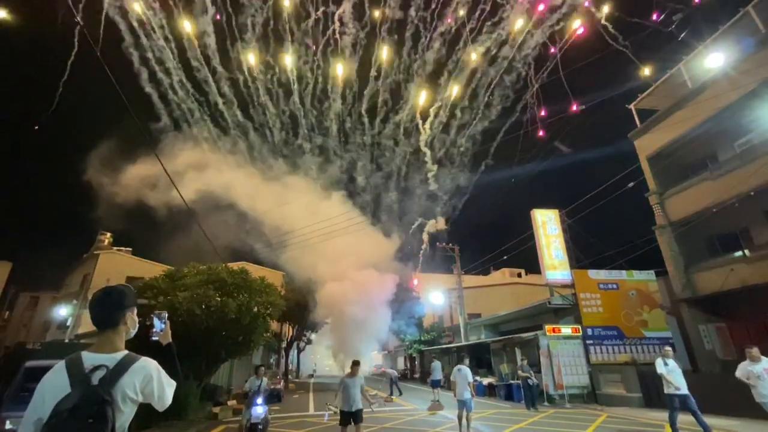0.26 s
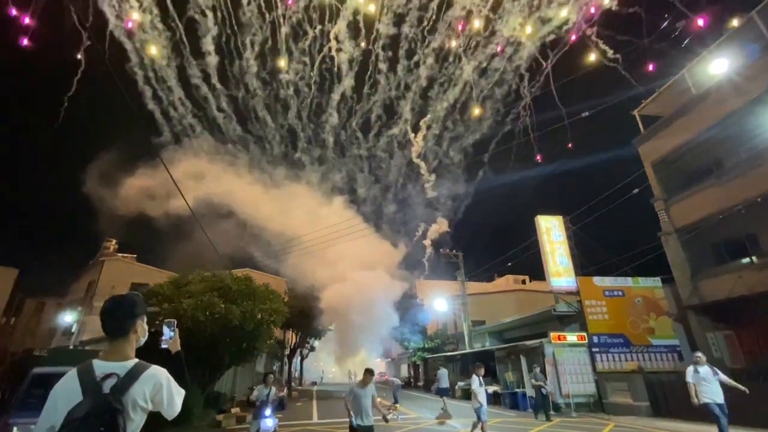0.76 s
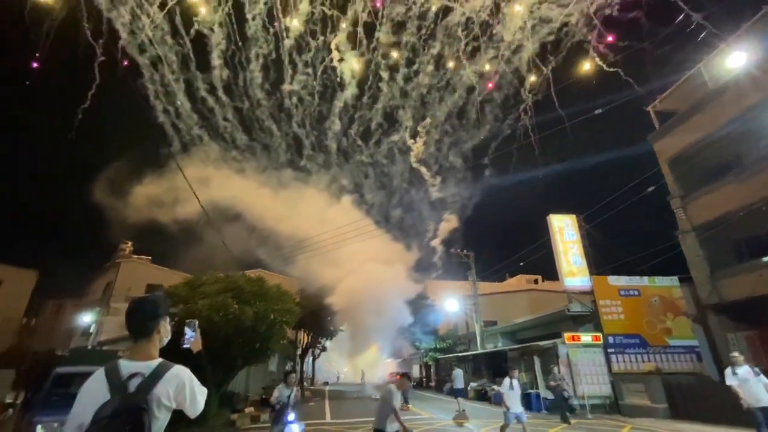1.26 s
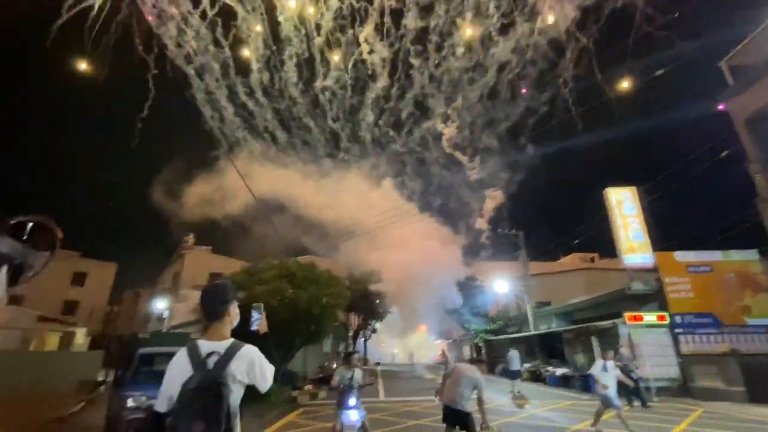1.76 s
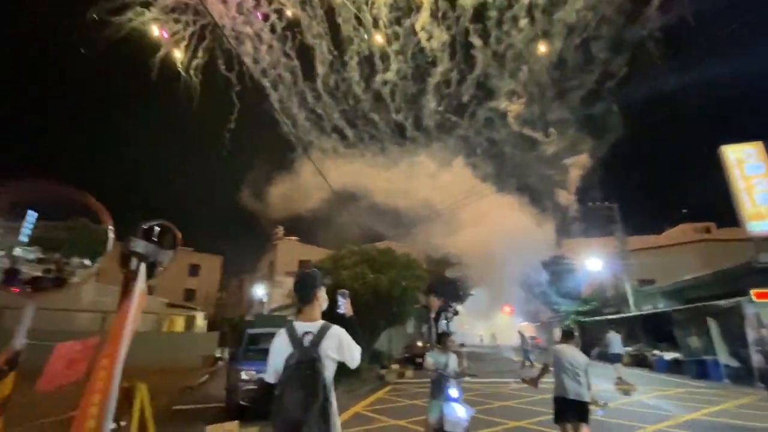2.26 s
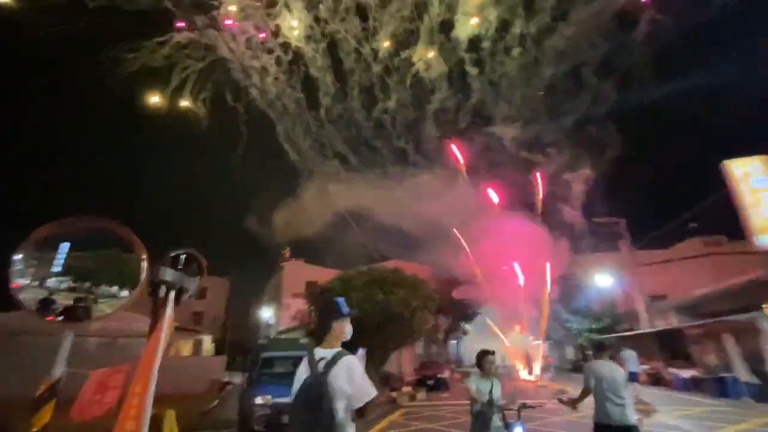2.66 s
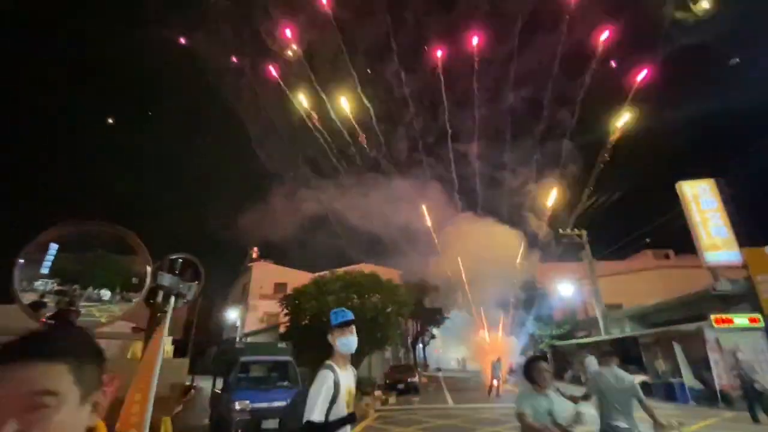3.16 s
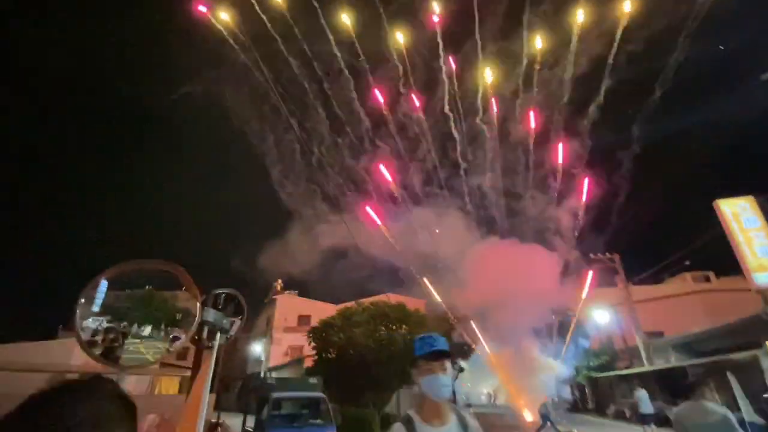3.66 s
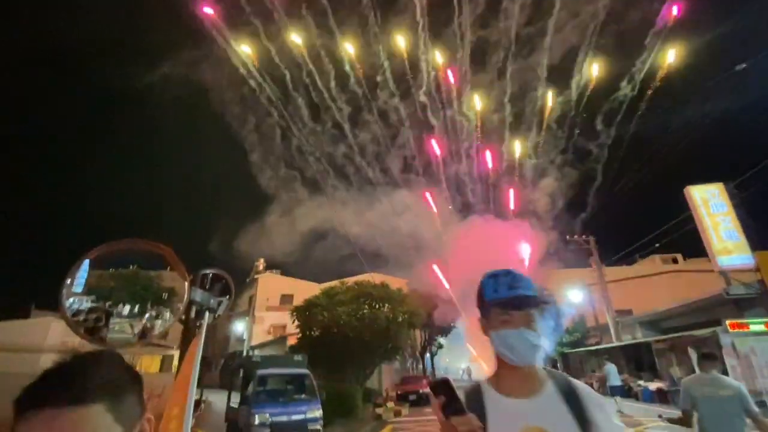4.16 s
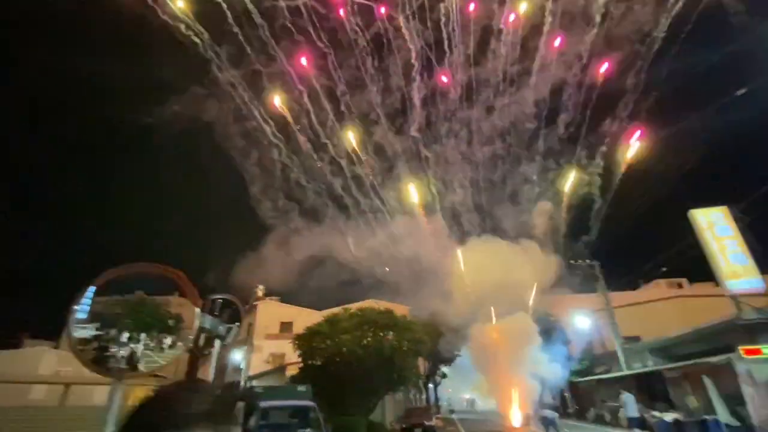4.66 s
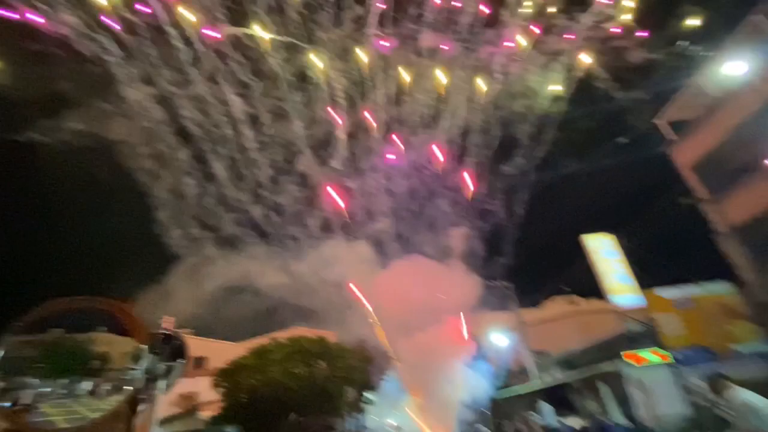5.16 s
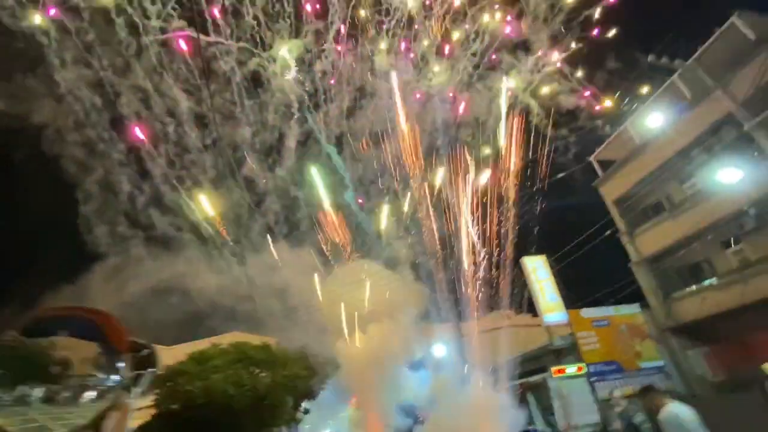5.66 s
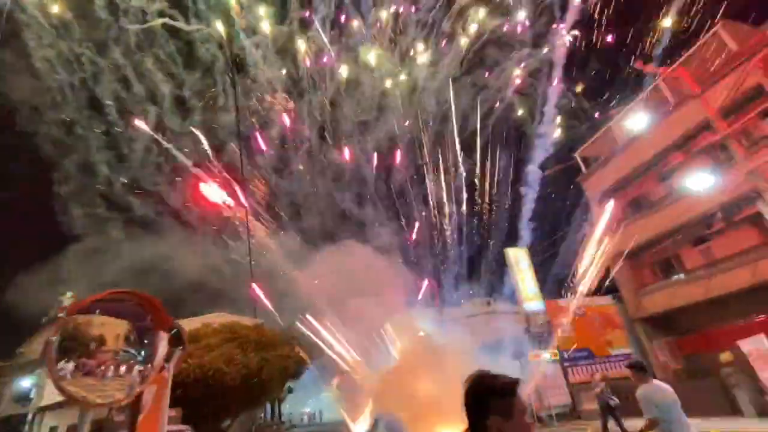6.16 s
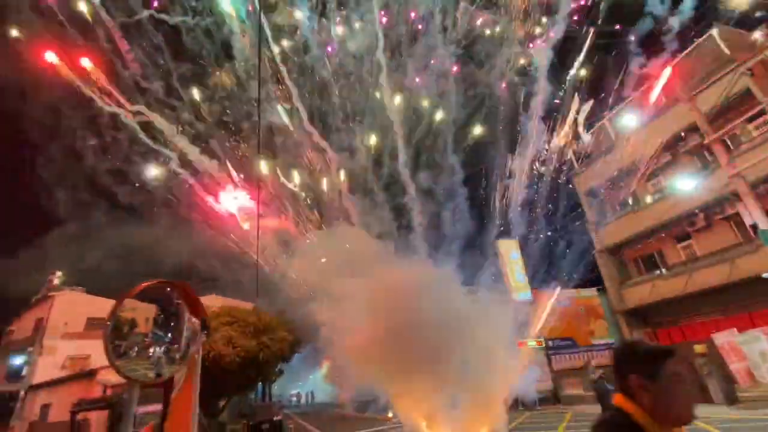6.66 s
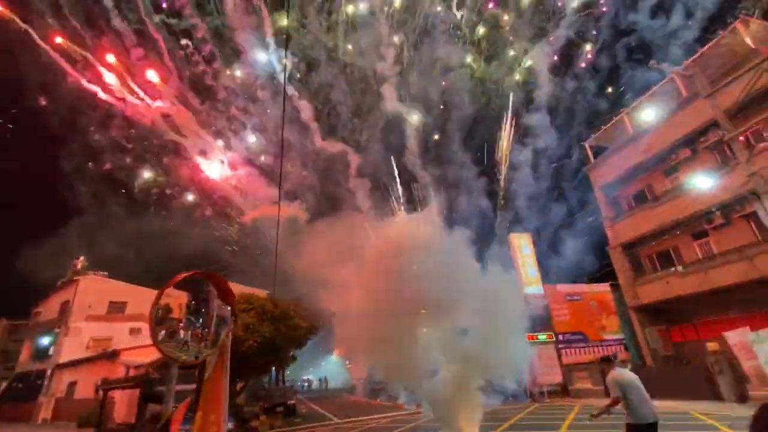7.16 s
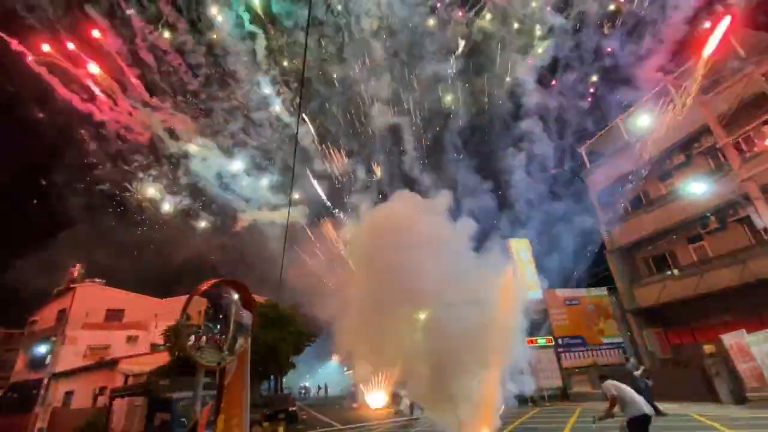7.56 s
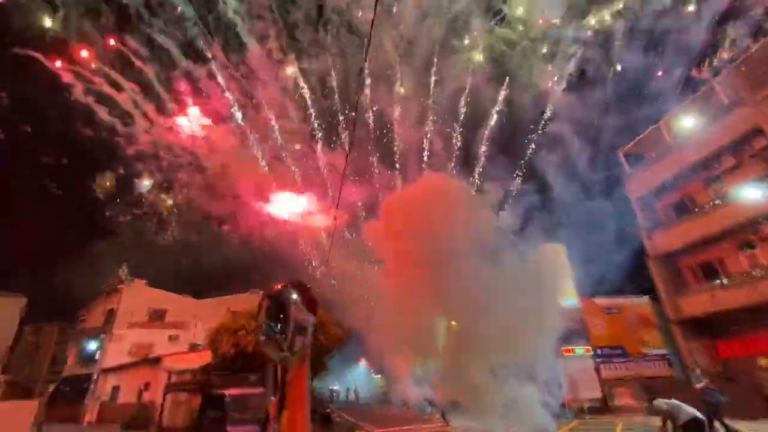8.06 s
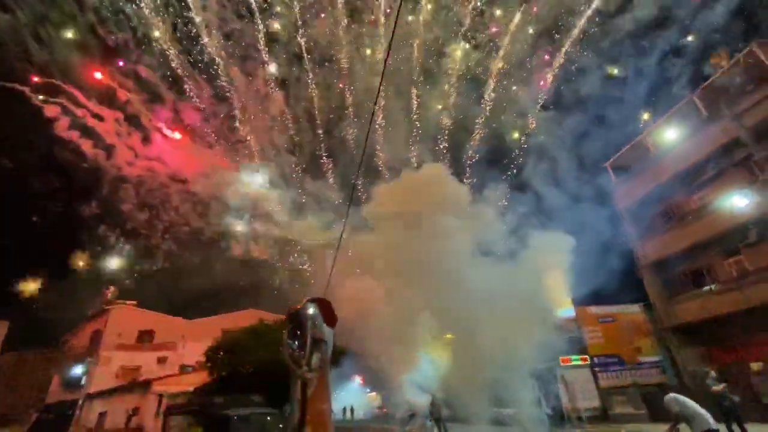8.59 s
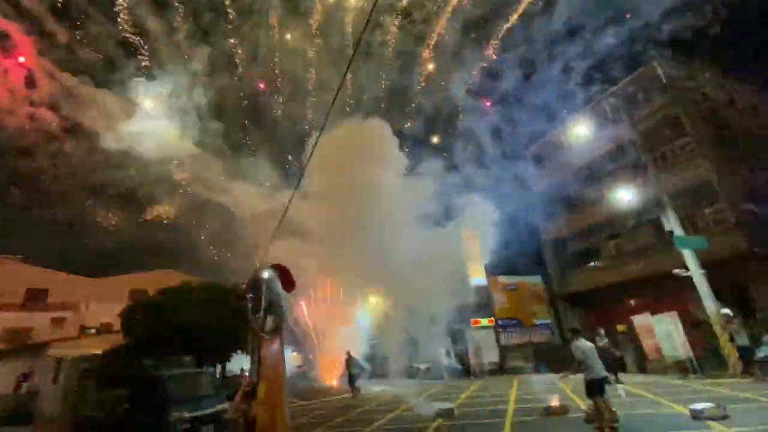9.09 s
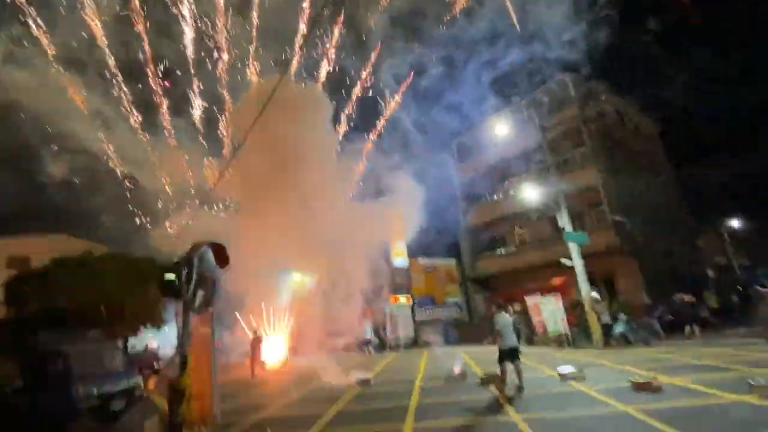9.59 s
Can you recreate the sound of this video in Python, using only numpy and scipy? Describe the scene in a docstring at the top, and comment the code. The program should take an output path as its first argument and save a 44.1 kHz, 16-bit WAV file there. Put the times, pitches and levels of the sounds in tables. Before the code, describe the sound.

Night street fireworks, heard outdoors by a close handheld stereo microphone that overloads on peaks. From 0 to 1.9 s, irregular shells pop overhead, sharp or dull, each followed milliseconds later by a duller road reflection; a tearing cluster hits at 1.5. A short lull with low rumble and a very faint hum follows until 2.4. Then tube batteries fire about twenty shots a second, low thumps with midrange cracks, some piercingly sharp, over sizzling sparks and far firecracker strings. Bangs are heaviest from 4.5 to 5.4. From 5.4 to about 8, over twenty shrill whistles overlap, starting high and falling as they fade, one wobbling early on, while thumps weaken. A ripping bang lands at 7.6. Crackle continues more thinly; star snaps come from 8.9, with tearing bangs at 9.1 and 9.6, the last with a brief hollow ring. House fronts give uneven, dying echoes, and bangs sweep downward.

```python
"""Batteries of tubes thump out stars in a street at night: low pressure jumps, each topped by a crack, some very sharp.
Shells pop overhead with an echo off the road, crackling stars snap late on, and clusters of charges tear.
Whistling rockets, tones that fall in pitch, climb away over crackling sparks and far firecracker strings.
House fronts throw the bangs and whistles back as uneven, dying echoes over a low rumble.
The recorder delays low notes, so that each bang sweeps downward."""
import sys
import numpy as np
from scipy import signal
from scipy.fft import rfft, irfft, next_fast_len
from scipy.io import wavfile
from scipy.ndimage import uniform_filter1d

SR = 44100
rng = np.random.default_rng(int(sys.argv[2]) if len(sys.argv) > 2 else 0)


def wav_out(sig):
    """Save sig, one row per channel (or a flat mono array), as 16-bit PCM at SR to the path in sys.argv[1]."""
    wavfile.write(sys.argv[1], SR, np.round(np.clip(np.atleast_2d(sig).T, -1, 1) * 32767).astype(np.int16))


N = 433503
TIME = np.arange(N) / SR


def amp(db):
    """Turns decibels into a gain."""
    return 10 ** (np.asarray(db) / 20)


def unit(x):
    """Scales a sound to an rms of one."""
    return x / np.sqrt(np.mean(x ** 2) + 1e-20)


def read(points, hz):
    """Reads a table between its points, on a log-frequency axis."""
    f, value = np.transpose(points)
    return np.interp(np.log(hz + 1), np.log(f + 1), value)


def level(curve, db):
    """Gain over time from a curve of (start_s, level_db), shifted by db."""
    return amp(db + np.interp(TIME, *np.transpose(curve)))


def add(mix, s, sound):
    """Mixes a sound into both channels at time s."""
    start = round(s * SR)
    part = mix[:, max(start, 0):max(start + sound.shape[1], 0)]
    part += sound[:, max(-start, 0):][:, :part.shape[1]]


def filtered(x, response):
    """Applies a response given as a function of frequency."""
    size = next_fast_len(x.shape[-1] + SR // 4)
    spectrum = rfft(x, size) * response(np.fft.rfftfreq(size, 1 / SR))
    return irfft(spectrum, size)[..., :x.shape[-1]]


def wander(t, per_s, count=4096):
    """A random curve of about unit size that picks a new value per_s times a second."""
    return np.interp(t * per_s, np.arange(count), rng.standard_normal(count))


# How alike sound from all around is at left and right: freq_hz, correlation (no unit)
LIKENESS = [(60, 0.88), (180, 0.94), (300, 0.89), (640, 0), (1500, 0.3), (3000, 0.12)]


def diffuse(x):
    """Sound from all around: alike on both sides in the bass, mostly unrelated in the treble."""
    def same(hz):
        return np.clip(read(LIKENESS, hz), -1, 1)

    shared = filtered(x[0], same)
    separate = filtered(x[1], lambda hz: np.sqrt(1 - same(hz) ** 2))
    return np.array([x[0], shared + separate])


def bed(drive, spectrum, gain):
    """Colours a steady texture with a spectrum and lets it follow a gain over time."""
    return unit(filtered(drive, lambda hz: amp(read(spectrum, hz)))) * gain


def crackle(per_s, spread_db, hiss):
    """Random snaps of varying size, each from its own direction, over the hiss of countless smaller ones."""
    happens = rng.random(N) < per_s / SR
    left = amp(spread_db * np.minimum(rng.exponential(1, N), 3)) * happens
    # direction: each snap reaches the right up to 14 samples early or late, louder or softer
    places = np.clip(np.arange(N) + rng.integers(-14, 14, N), 0, N - 1)
    right = np.bincount(places, left * rng.uniform(.5, 1.5, N), N)
    return unit(np.array([left, right])) + hiss * rng.standard_normal((2, N))


def clumped(x, swell_db, patch_db):
    """Snaps come in clumps: all bands swell together, and patches of colour come and go."""
    hz, t, z = signal.stft(x, SR, nperseg=256)
    patches = rng.standard_normal(z.shape[1:])
    patches = uniform_filter1d(patches, size=7, axis=0)
    patches = unit(uniform_filter1d(patches, size=12, axis=1))
    gain = amp(swell_db * wander(t, 28) + patch_db * patches)
    return signal.istft(z * gain, SR, nperseg=256)[1][:, :N]


def puff(hz, decay_s, above_hz):
    """Spectra, one for each side, of a few milliseconds of dying noise with little bass."""
    t = np.arange(2 * len(hz) - 2) / SR
    noise = rng.standard_normal((2, len(t))) * np.exp(-t / decay_s)
    return rfft(noise / np.linalg.norm(noise[0])) * 1j * hz / (above_hz + 1j * hz)


def blast(db, centre_hz, edge_hz, lag_s, echoes, roughness=0, size=2048):
    """A pressure jump and its suction, (1 - u) exp(-u), dulled by air, with a short rough wake of turbulent gas.
    Echoes are (delay_s, left gain, right gain); lag_s is how much later the left side hears it."""
    hz = np.fft.rfftfreq(size, 1 / SR)

    def delay(s):
        return np.exp(-2j * np.pi * hz * s)

    u = 1j * hz / centre_hz
    jump = amp(db) * SR / (2 * np.pi * centre_hz) * u / (1 + u) ** 2
    dulled = jump / (1 + 1j * hz / edge_hz) ** 2
    paths = np.array([delay(lag_s), delay(0)])
    for s, left, right in echoes:
        paths = paths + np.array([[left], [right]]) * delay(s)
    paths += roughness * puff(hz, decay_s=0.0048, above_hz=294)
    # 64 samples of room, so that the left side can also come first
    return irfft(dulled * paths * delay(64 / SR), size)


TRAFFIC_DB, ROLL_DB = -51, -8  # steady street rumble, and the roll that follows each bang
ROLL_RISE_S, ROLL_DECAY_S = 0.0037, 0.12


def roll(bangs):
    """Gain of the rumble: each bang swells it and it dies back to the traffic."""
    power = (bangs ** 2).mean(0)
    for seconds in ROLL_RISE_S, ROLL_DECAY_S:
        keep = np.exp(-1 / (seconds * SR))
        power = signal.lfilter([1 - keep], [1, -keep], power)
    return np.sqrt(amp(ROLL_DB) ** 2 * power + amp(TRAFFIC_DB) ** 2)


# Tone of the street rumble: freq_hz, relative level_db
RUMBLE = [(20, -26), (40, -5), (62, 3), (100, 0), (200, 4.5), (350, -0.5), (600, 7), (1500, -41)]


def street_rumble(bangs):
    """Low noise from all around, swelled by the deeper part of the bangs."""
    deep = filtered(bangs, lambda hz: 1 / (1 + (hz / 900) ** 2))
    return bed(diffuse(rng.standard_normal((2, N))), RUMBLE, roll(deep))


# Tone of the far firecracker strings: freq_hz, relative level_db
FAR_TONE = [(100, -31), (300, -4.5), (600, 4), (1000, 1.5), (1600, -1.5), (2500, -3.5), (5000, -13),
            (12000, -31)]
# Loudness of the far strings, before a small trim: start_s, level_db
FAR_LEVEL = [(0.0, -31.5), (0.44, -45.5), (0.68, -38), (0.96, -42), (1.45, -38), (1.75, -35.5),
             (2.19, -48.5), (2.46, -54), (2.6, -25), (2.65, -33), (3.45, -27), (6.41, -31), (6.79, -36.5),
             (7.64, -32.5), (8.05, -35), (9.17, -35.5), (9.44, -42), (9.83, -37)]


def far_strings():
    """Far firecracker strings: hundreds of random snaps a second over hiss, in clumps."""
    snapping = crackle(per_s=500, spread_db=3.5, hiss=1.0)
    return bed(clumped(snapping, swell_db=0.5, patch_db=3.0), FAR_TONE, level(FAR_LEVEL, db=-1.97))


# Tone of burning sparks, also used by the stars: freq_hz, relative level_db
FIZZ_TONE = [(600, -9.5), (1500, 0), (2500, 0.5), (4000, 1.5), (5500, -0.5), (7000, -4), (8200, -5),
             (12000, -14.5), (16000, -16)]
# Loudness of the burning sparks, before a trim: start_s, level_db
FIZZ_LEVEL = [(0.0, -55), (1.07, -67.5), (1.72, -59), (2.14, -75), (2.46, -68), (2.6, -32), (2.68, -39),
              (2.94, -34), (3.0, -49), (3.15, -41), (3.6, -37.5), (3.7, -44), (3.9, -37), (4.02, -43),
              (4.6, -38), (5.25, -53), (5.45, -36.5), (6.02, -36.5), (6.54, -31), (6.81, -34.5), (7.5, -31),
              (7.97, -34.5), (8.51, -35), (8.93, -34), (9.39, -39), (9.83, -39)]


def burning_sparks():
    """Burning sparks: dense, bright random snaps over hiss, in clumps."""
    snapping = crackle(per_s=900, spread_db=2.5, hiss=0.93)
    return bed(clumped(snapping, swell_db=0.7, patch_db=2.0), FIZZ_TONE, level(FIZZ_LEVEL, db=4.5))


def hum(start_s=1.73, length_s=0.43, hz=199, level_db=-50):
    """A faint low sine swells and fades in the street as the first shells die away."""
    out, t = np.zeros((2, N)), np.arange(0, length_s, 1 / SR)
    swell = amp(level_db) * np.sin(np.pi * t / length_s)
    add(out, start_s, (swell * np.sin(2 * np.pi * hz * t))[None])
    return out


# Hollow ring: start_s, pitch_hz, level_db, t60_s (time to die by 60 dB)
RING = [(9.632, 386, -26.5, 0.25), (9.632, 730, -24, 0.17)]


def ring():
    """Something hollow rings at the last bangs: unsteady sines that die away."""
    out, t = np.zeros((2, N)), np.arange(SR // 2) / SR
    for s, hz, db, t60 in RING:
        gain = amp(db - 60 * t / t60) * (1 + 0.68 * wander(t, 106))
        add(out, s, gain * np.sin(2 * np.pi * hz * t)[None])
    return out


# How long echoes last in the street: freq_hz, t60_s (time to die by 60 dB)
STREET_T60 = [(60, 0.089), (250, 0.44), (1000, 0.23), (4000, 0.37), (12000, 0.13)]


def street(x, first_s=0.0038, lumpy_db=4):
    """Uneven echoes from house fronts, each band dying at its own speed."""
    t = np.arange(SR) / SR
    taps = rng.standard_normal((2, SR)) * (rng.random((2, SR)) < 1500 / SR)  # about 1500 echoes a second
    taps = taps * amp(lumpy_db * wander(t, 118.0)) * (1 - np.exp(-(t / first_s) ** 2))
    hz, age, z = signal.stft(diffuse(taps), SR, nperseg=256)
    dying = amp(-60 * age / read(STREET_T60, hz)[:, None])
    tail = signal.istft(z * dying, SR, nperseg=256)[1]
    return signal.fftconvolve(x, tail / np.linalg.norm(tail[0]), axes=1)[:, :N]


def rotating_echoes(x, count=4):
    """Several sets of street echoes take turns, blending into one another over time."""
    turns = TIME * 3.3  # goes round all the sets 3.3 times a second
    out = np.zeros((2, N))
    for k in range(count):
        away = np.minimum(count * abs((turns + k / count) % 1 - .5), 1)
        out += street(x * np.cos(np.pi / 2 * away))
    return out


# Charges that go off almost together: start_s, length_s, level_db (of the loudest possible charge),
# centre_hz (middle pitch of the blasts; single charges scatter around it)
CLUSTERS = [(.001, 0.01, -9, 570), (1.543, 0.0097, -3.5, 800), (2.408, 0.0071, -13, 550),
            (5.029, 0.019, -2, 800), (5.316, 0.0038, -18, 91.5), (7.604, 0.017, 2, 967),
            (9.081, 0.013, 3, 1390), (9.614, 0.019, 5.5, 1550), (9.623, 0.013, -6, 230),
            (9.65, .03, -14, 280)]
CLUSTER_EDGE_RATIO = 4.8  # treble edge over centre_hz


def clusters(count=9, early_s=.0008):
    """Several charges share a fuse and blur into one tearing bang."""
    out = np.zeros((2, N))
    for s, length, db, centre_hz in CLUSTERS:
        edge_hz = CLUSTER_EDGE_RATIO * centre_hz
        for k, (a, b, c) in enumerate(rng.random((count, 3))):
            echoes = [(0.0022 * c, .4, -.3)]
            charge_hz = centre_hz * 2 ** (c - .5)
            bang = blast(db - 6 * b, charge_hz, edge_hz, 0.000063 * (b - .5), echoes, roughness=0.82)
            add(out, s - early_s + length * (k + a) / count, bang)
    return out


def whistle(t, hz, gain, shriek_db, flutter_db=2.5, second_db=-13, third_db=-18, rasp=0.39,
            shriek_ratio=1.48, shriek_s=0.14, ground=0.42):
    """A burning tube sings on the pitch hz, with breathy overtones and an echo off the road."""
    # the flame is unsteady, most of all just after lighting
    jitter = (.032 * wander(t, 900) + .028 * wander(t, 160)) / (1 + t / .08)
    jitter += (.012 * wander(t, 400) + .013 * wander(t, 35)) / (1 + t / .7)
    phase = 2 * np.pi * np.cumsum(hz * (1 + jitter)) / SR
    tone = np.sin(phase)
    tone += amp(second_db) * np.sin(2 * phase) * wander(t, 1200)
    tone += amp(third_db) * np.sin(3 * phase) * wander(t, 2500)
    # the rushing exhaust spreads a hoarse band above the note, strongest at lift-off
    tone += rasp * np.sin(1.12 * phase) * wander(t, 1300) * (.5 + np.exp(-t / .06))
    # a higher mode of the tube builds up and shrieks on and off
    shriek = np.sin(shriek_ratio * phase) * (.5 + .8 * wander(t, 500))
    tone += amp(shriek_db) * shriek * (1 - np.exp(-t / .012)) * np.exp(-t / shriek_s)
    tone *= gain * amp(flutter_db * wander(t, 129.0))
    # the road's echo lags more and more as the rocket climbs
    road_lag_s = 0.0066 * t / (t + 0.376)
    sides = []
    for direct_s, echo_s in rng.uniform(0, 0.000399, (2, 2)):
        direct = np.interp(t - direct_s, t, tone)
        sides.append(direct + ground * np.interp(t - echo_s - road_lag_s, t, tone))
    return np.array(sides)


# Path of the tumbling rocket: start_s, pitch_hz, level_db
TUMBLER = [(5.43, 3600, -15), (5.438, 3800, -8), (5.443, 4450, -22), (5.452, 3650, -19), (5.462, 4400, -15),
           (5.475, 3850, -23), (5.487, 4200, -20), (5.535, 3850, -23), (5.55, 3250, -24),
           (5.572, 3650, -19), (5.6, 3230, -28), (5.64, 3280, -27), (5.66, 3500, -29), (5.681, 3230, -33),
           (5.7, 3480, -23), (5.72, 3280, -24), (5.75, 3480, -20), (5.79, 3230, -23), (5.81, 3400, -30),
           (5.87, 3180, -30)]


def tumbler(fade_s=.003):
    """One rocket tumbles, so that its note swings up and down as it sinks."""
    out, (when, hz, db) = np.zeros((2, N)), np.transpose(TUMBLER)
    t = np.arange(0, when[-1] - when[0], 1 / SR)
    fade = np.minimum(np.minimum(t, t[-1] - t) / fade_s, 1)
    gain = amp(np.interp(t + when[0], when, db)) * fade
    add(out, when[0], whistle(t, np.interp(t + when[0], when, hz), gain, shriek_db=-7))
    return out


# Whistling rockets: start_s, level_db (before trim_db), start_hz, settled_hz (after the first drop),
# end_hz (where the sag leads), drop_s (time of the first drop), away_s (time to half strength),
# shriek_db (against the note)
ROCKETS = [(5.374, -9.5, 4300, 3374, 2570, 0.015, .033, -9),
           (5.612, -16.5, 4440, 3410, 2854, .024, 0.044, -8),
           (5.724, -17, 3610, 3460, 2795, .03, 0.082, -3),
           (5.892, -15.5, 4200, 3400, 2734, 0.019, 0.11, -3),
           (5.975, -20.5, 4180, 3320, 2732, 0.032, .13, -13),
           (6.01, -17, 3540, 3260, 2685, 0.037, 0.089, -24),
           (6.09, -20.5, 4360, 3316, 2670, 0.031, .06, -20),
           (6.267, -18, 4106, 3400, 2588, 0.035, 0.12, -1), (6.29, -20, 4090, 3450, 2690, 0.032, .1, 2),
           (6.368, -12.5, 3400, 3140, 2743, 0.027, 0.036, -17),
           (6.39, -16, 4290, 3500, 2740, 0.028, .035, -6),
           (6.495, -18.5, 3966, 3380, 2800, .022, 0.21, -6.5),
           (6.547, -18, 4100, 3310, 2762, .018, 0.068, -4.5),
           (6.558, -14.5, 4730, 3540, 2920, .028, 0.057, -8),
           (6.72, -17, 4055, 3340, 2860, 0.021, 0.081, -5), (7.005, -21, 4120, 3400, 2640, .03, .08, -5),
           (7.106, -22, 4066, 3270, 2610, 0.024, 0.17, -7),
           (7.239, -20.5, 4110, 3335, 2540, 0.028, 0.088, -6),
           (7.315, -18.5, 3830, 3490, 2564, 0.026, 0.15, -2),
           (7.388, -20, 4320, 3530, 2650, 0.029, 0.078, -12),
           (7.478, -17.5, 3645, 3435, 2660, .025, 0.08, -2.5),
           (7.625, -18, 3610, 3210, 2610, .028, 0.043, -14),
           (7.702, -26, 4110, 3450, 2846, 0.025, 0.28, -7)]
SAG_S, BURN_S = .3, 0.81  # time of the slow sag in pitch, and how long a rocket whistles


def whistles(trim_db=-0.5, attack_s=0.0013):
    """Rockets leave one after another; each drops quickly in pitch, then sags and fades as it speeds away."""
    out, t = np.zeros((2, N)), np.arange(SR) / SR
    for s, db, start_hz, settled_hz, end_hz, drop_s, away_s, shriek_db in ROCKETS:
        sag = (settled_hz - end_hz) * np.exp(-t / SAG_S)
        drop = (start_hz - settled_hz) * np.exp(-t / drop_s)
        attack = 1 - np.exp(-t / attack_s)
        gain = amp(db + trim_db) * attack / (1 + t / away_s) * np.exp(-(t / BURN_S) ** 4)
        add(out, s, whistle(t, end_hz + sag + drop, gain, shriek_db))
    return out


# Shells bursting overhead and, late on, sharp snaps of crackling stars:
# start_s, level_db (peak before the air dulls it), edge_hz (treble edge)
BURSTS = [(0.0161, -0.5, 10900), (0.1569, 1, 7400), (0.185, -6, 3000), (0.2427, -0.5, 10500),
          (.269, 4.5, 6450), (0.429, -7, 2600), (.446, -11.5, 3000), (0.476, -8, 3000), (0.542, -8, 1600),
          (0.557, 0.5, 3500), (.58, 0, 3800), (0.64, 3, 2600), (.697, 1, 3600), (0.7044, -2, 13000),
          (0.7201, 4, 3500), (.812, 4.5, 2610), (0.8584, 1, 2420), (1.0519, 2.5, 3830),
          (1.0656, -4.5, 2620), (1.129, -6, 3200), (1.202, -5.5, 2440), (1.2262, -1.5, 1710),
          (1.2383, -9.5, 5500), (1.3103, 4, 2960), (1.446, 0, 6800), (1.472, -6, 3600),
          (1.5456, -0.5, 8700), (1.5546, 0, 4500), (1.5653, 3, 3600), (1.6662, 0, 12600), (1.677, 2, 5200),
          (1.7511, 1.5, 8700), (1.8768, 0.5, 12600), (4.5261, 3, 7400), (5.0314, 11, 4300),
          (5.186, 2, 4500), (5.2423, 3.5, 2030), (8.867, -7.5, 5200), (8.9755, -10, 15000),
          (9.159, -9, 4500), (9.204, -5, 7400), (9.232, -6.5, 4480), (9.309, -6.5, 12000),
          (9.344, -7.5, 12000)]
BURST_HZ, BURST_SCATTER_OCTAVES = 687, 0.39  # blast centre of a burst, and the full range of its scatter
ROAD_ECHO_S, ROAD_ECHO_SPREAD_S = .0071, .0016  # delay of the road echo; it varies with burst height


def overhead_bursts(ground=0.85, early_s=.0007, left_leads_s=0.00021, road_dulling=0.72):
    """Each shell or star snap arrives from above, then again, duller, off the road some milliseconds later."""
    out = np.zeros((2, N))
    for (s, db, edge_hz), (a, b, c, size, height) in zip(BURSTS, rng.random((len(BURSTS), 5))):
        centre_hz = BURST_HZ * 2 ** (BURST_SCATTER_OCTAVES * (size - .5))
        echo_s = ROAD_ECHO_S + ROAD_ECHO_SPREAD_S * (height - .5)
        lag_s = 0.00019 * (c - .5) - left_leads_s
        echoes = [(0.000495 + 0.00095 * a, .35, -.2), (0.00081 + 0.0022 * b, -.1, .25)]
        arrivals = [(s, 1, edge_hz), (s + echo_s, ground, road_dulling * edge_hz)]
        for arrival, gain, treble_hz in arrivals:
            burst = blast(db, centre_hz, treble_hz, lag_s, echoes, roughness=0.36)
            add(out, arrival - early_s, gain * burst)
    return out


def stars(shots, trim_db=-32, burn_s=0.083):
    """Each star leaves its tube with a spit of sparks that fades as it climbs."""
    power, t = np.zeros((2, N)), np.arange(SR // 4) / SR
    for s, db, _ in shots:
        add(power, s, (amp(db + trim_db) * np.exp(-t / burn_s))[None] ** 2)
    return bed(crackle(per_s=900, spread_db=3.0, hiss=0.23), FIZZ_TONE, np.sqrt(power))


# Sharp reports of some tube shots and one shell burst: start_s, level_db (before trim_db), centre_hz (middle
# pitch of the blast)
SHARP_REPORTS = [(1.447, -9, 4000), (2.498, 3.5, 4500), (2.64, 8.5, 5000), (2.7, 8, 4000),
                 (2.894, -2, 3000), (3.184, -1, 4500), (3.47, 3, 6000), (3.527, 1.5, 2200),
                 (3.597, 0, 5500), (3.656, 0, 5500), (3.722, 2, 3500), (3.898, -3, 3200), (3.932, -3, 4000),
                 (4.503, 5.5, 3960), (4.583, 4, 4000), (4.7057, 7.5, 4000), (4.819, 6.5, 4000),
                 (4.841, 5, 4000), (4.937, 5.5, 2800), (4.968, 7.5, 3980), (4.979, 5, 4500),
                 (5.094, 8, 4000), (5.129, 11.5, 3900), (5.2, 13, 4000), (5.318, 14, 4000),
                 (5.367, 9, 3700), (5.4177, 8.5, 4000), (6.366, 8, 3900), (9.073, 2, 2190),
                 (9.508, 2, 7000), (9.5997, 6.5, 2400)]


def sharp_reports(trim_db=-1.5, early_s=.0003, edge_hz=13000):
    """Some shots crack with a very short, bright report and two close echoes."""
    out = np.zeros((2, N))
    echoes = [(.00024, 0.26, 0.55), (.00048, 0.19, 0.17)]
    for s, db, centre_hz in SHARP_REPORTS:
        add(out, s - early_s, blast(db + trim_db, centre_hz, edge_hz, .00003, echoes, roughness=0.82))
    return out


# Lift charges fired from tubes on the road: start_s, thump_db (low thump, before trim_db),
# crack_db (midrange crack); both are peaks before dulling
LIFTS = [(2.423, -4.5, -0.5), (2.498, 1, 0), (2.566, 2, 2.5), (2.592, -1.5, 1), (2.607, -8, -7),
         (2.64, 0, 0), (2.681, -2.0, 7.5), (2.7, -3, 1.5), (2.7495, 1.5, 5), (2.792, -1.5, 2.5),
         (2.848, -2, 8), (2.884, 0, 7), (2.892, -1.5, 7), (3.018, -2, 4), (3.064, -1.5, 6.5),
         (3.109, 1.5, 4), (3.125, -1.5, 7), (3.179, -2, 7), (3.184, 0, 7.5), (3.2305, -2, 6),
         (3.245, -1.5, 2), (3.304, -5, 4.5), (3.316, -7, 4), (3.351, 2, 3), (3.395, -2, 4),
         (3.427, -4, 4.5), (3.47, -0.5, 3), (3.497, 0.5, 4.5), (3.527, 1, 3.5), (3.598, 1, 6),
         (3.656, -1, -1), (3.721, -0.5, -9), (3.736, 0, 1), (3.77, 1, -5), (3.797, -14, -6),
         (3.808, -1, -16), (3.821, -1.0, 1), (3.868, -3.5, -8), (3.899, 1.5, 1), (3.932, -2, 2),
         (3.952, -3.5, -1), (3.976, -4, 2), (4.039, -2, -2), (4.053, 1.5, -1), (4.088, -5, -2),
         (4.119, 0, 1), (4.1585, -4, 0), (4.19, -1.5, 6.5), (4.252, 2, 4), (4.327, -3, 5.5),
         (4.38, 1.5, 4.5), (4.41, 1.5, -3), (4.486, -3, 5.5), (4.502, -0.5, 3), (4.58, -3, 7),
         (4.608, -1.5, 1.5), (4.653, -1.5, 6.5), (4.7065, 4, 8), (4.777, -1, 7.5), (4.819, -0.5, 1),
         (4.842, -1, 7), (4.855, 0, 2.5), (4.868, -2.5, 3), (4.937, -0.5, 2.5), (4.969, 1.5, 2.5),
         (5.093, 1, 6.5), (5.13, 1, 4), (5.2, -2, 4.5), (5.267, 1, 6.5), (5.286, -6.5, 9), (5.319, 7, -13),
         (5.367, 3.5, 1), (5.406, -18, -3), (5.417, -4, -18), (5.512, -22, -3), (5.526, -11, -3),
         (5.543, -2, -9), (5.556, -14, 7.5), (5.564, 0, 3), (5.602, 1, 4), (5.64, -21, -1), (5.696, -3, 2),
         (5.728, -5, 3), (5.7475, 0.5, -6), (5.758, -10, 6.5), (5.811, -14, 4.5), (5.885, -4, 6),
         (5.915, -8.0, -17), (5.93, 1.5, -2), (5.96, -10, 4.5), (5.97, -2.5, -8), (6.08, -12, 7),
         (6.087, -2, -5), (6.105, -31, -13), (6.142, -14, 4.5), (6.168, -4, -7), (6.19, -4, -2),
         (6.218, -7, 3), (6.239, 1.5, -7), (6.25, -3.5, -3), (6.271, 1.5, 8.5), (6.369, -2, -4),
         (6.388, -4.5, -7), (6.42, -10, 0), (6.48, -10, -1), (6.498, -8.5, -5), (6.53, -8.5, -8),
         (6.554, -5, -11), (6.569, -6, -7), (6.636, -9, -20), (6.669, -9, -19), (6.687, -12, -2),
         (6.703, -5, -7), (6.726, -6, -4), (6.91, -13, -5), (6.958, -5, -20), (6.998, -5, -7),
         (7.056, -7.5, -10), (7.092, -9, -5), (7.199, -7.5, -2), (7.226, -7, -13), (7.271, -10.0, -2),
         (7.305, -7.5, -4), (7.377, -14, -19), (7.4, -8, -7), (7.421, -9, -8), (7.463, -16, 0),
         (7.531, -9.5, -13), (7.59, -13, -6), (7.645, -10, -16), (7.697, -5.5, -16), (7.846, -15, 0),
         (9.072, -4.5, -6), (9.6006, -2.5, -6)]
# Tone of the battery that is firing: start_s, centre_hz (middle pitch of the thump; tubes scatter around it),
# edge_hz (treble edge of the crack)
BATTERY = [(2.5, 253, 4350), (3.1, 268, 2380), (3.8, 207, 2240), (4.4, 213, 2440), (4.6, 249, 4140),
           (5.3, 247, 4000), (5.7, 228, 1780)]
TUBE_SCATTER_OCTAVES = 0.09  # full range by which the tubes of one battery differ


def tubes(shots, trim_db=-2, early_s=.0005, crack_hz=1000, thump_edge_hz=1700, round_trip_s=0.00196):
    """Lift charges at street level: a thump and a crack, reflected within milliseconds by road and nearby things."""
    out, (when, centres, edges) = np.zeros((2, N)), np.transpose(BATTERY)
    for (s, db, crack_db), (a, b, c, d, bore) in zip(shots, rng.random((len(shots), 5))):
        centre_hz = np.interp(s, when, centres) * 2 ** (TUBE_SCATTER_OCTAVES * (bore - .5))
        edge_hz = np.interp(s, when, edges)
        echoes = [(0.00046 + 0.00015 * a, .4, -.1), (0.00088 + 0.0007 * b, .1, .6),
                  (0.00812 + 0.0099 * c, .18, .16)]
        lag_s = .0001 + 0.00026 * a
        add(out, s - early_s, blast(db + trim_db, centre_hz, thump_edge_hz, lag_s, echoes, roughness=0.73))
        # the steep front at the muzzle cracks on top of the thump and returns inverted from the tube
        returned = [(round_trip_s * (1 + 0.31 * (d - .5)), -.4, -.4)]
        add(out, s - early_s, blast(crack_db, crack_hz, edge_hz, lag_s, returned, roughness=0.84))
    return out


def scene():
    """Bangs and whistles in the street, over rumble, far strings and sparks."""
    overhead = overhead_bursts()
    lifts = tubes(LIFTS) + sharp_reports() + stars(LIFTS)
    salvos = clusters()
    rockets = whistles() + tumbler()
    dry_mix = amp(-15.0) * overhead + amp(-8.5) * lifts + amp(-9.5) * salvos + amp(-12.5) * rockets
    echo = rotating_echoes(dry_mix)
    rumble = street_rumble(lifts + salvos + amp(-1.5) * overhead)
    background = rumble + far_strings() + burning_sparks() + hum() + ring()
    balance = amp([[-.6], [.6]])  # dB for left and right
    return (overhead + lifts + salvos + rockets + echo + background) * balance


# Tone of the microphone: freq_hz, level_db
MICROPHONE = [(20, -35), (40, -3), (65, 6), (130, 0.5), (220, 2), (400, 1.5), (560, -3), (800, 0),
              (2000, -1.5), (3300, -1.5), (4150, 1), (5800, -2.5), (6700, 2.5), (7900, -3.5), (10000, 1),
              (12000, 2.5), (16000, -5.5)]


def record(dry, sweep=1.32, knee_hz=60, top_hz=1500, limit_hz=16000):
    """The recorder colours the sound, delays notes between knee and top by about sweep / Hz seconds, clips and
    cuts the highest treble."""
    def response(hz):
        turns = sweep * np.log((1 + hz / knee_hz) / (1 + hz / top_hz))
        return amp(read(MICROPHONE, hz)) * np.exp(-2j * np.pi * turns)

    swept = np.clip(filtered(dry, response), -1, 1)
    band_limit = signal.firwin(255, limit_hz, window=("kaiser", 9), fs=SR)
    return signal.oaconvolve(swept, band_limit[None], "same")


dry = scene()
out = record(dry)
wav_out(out)
```